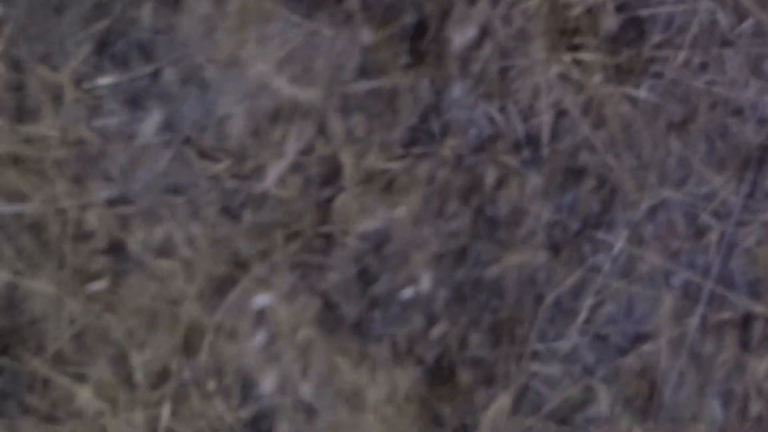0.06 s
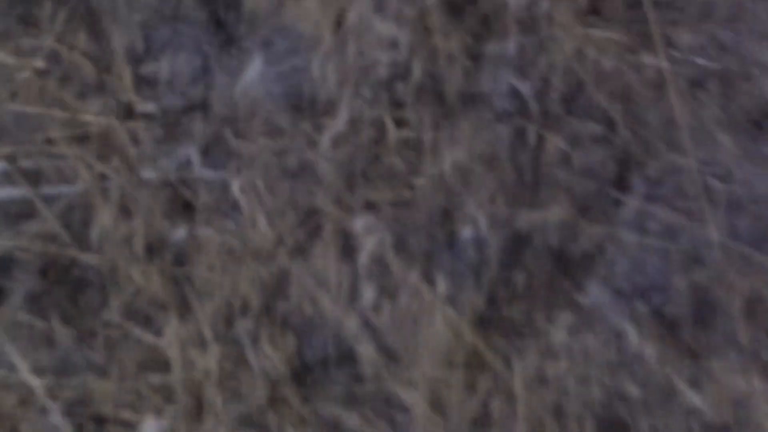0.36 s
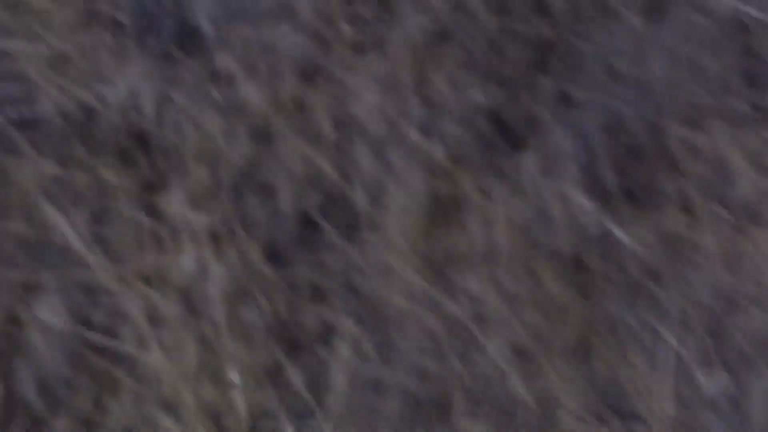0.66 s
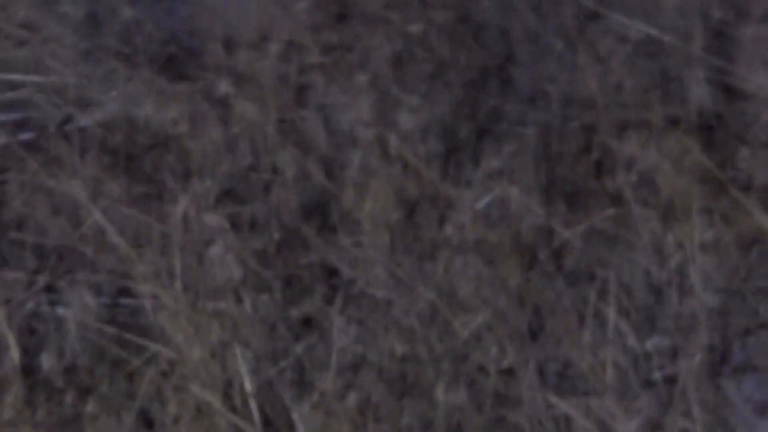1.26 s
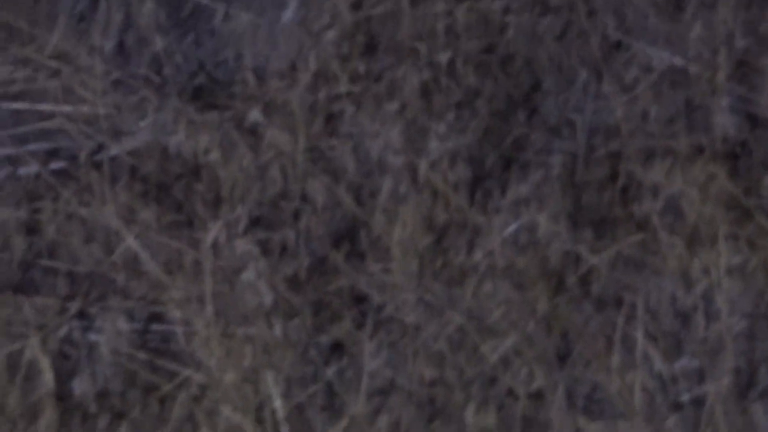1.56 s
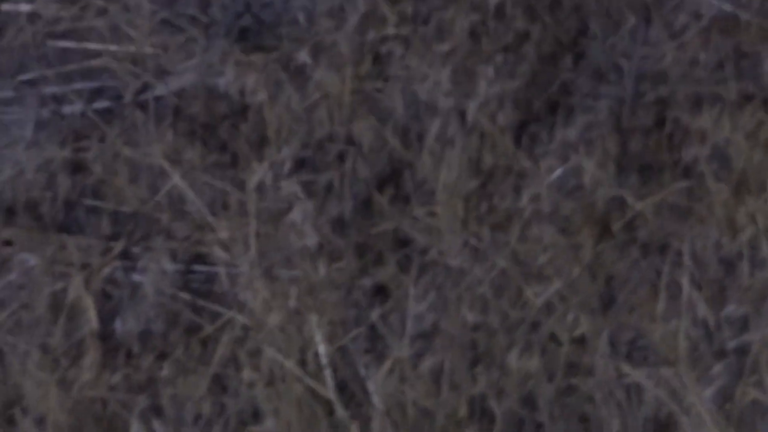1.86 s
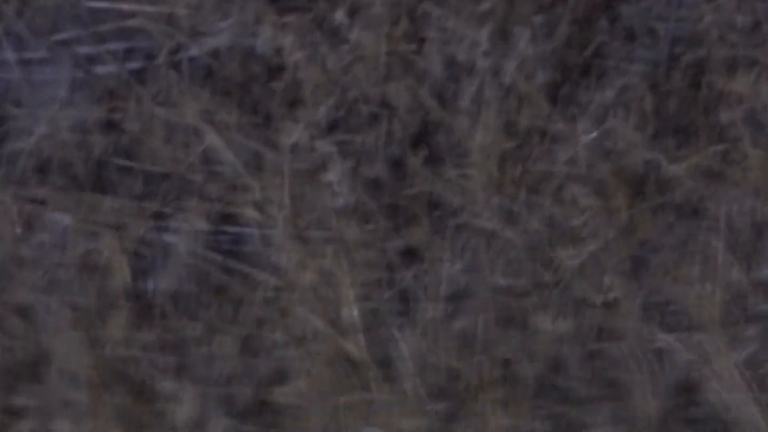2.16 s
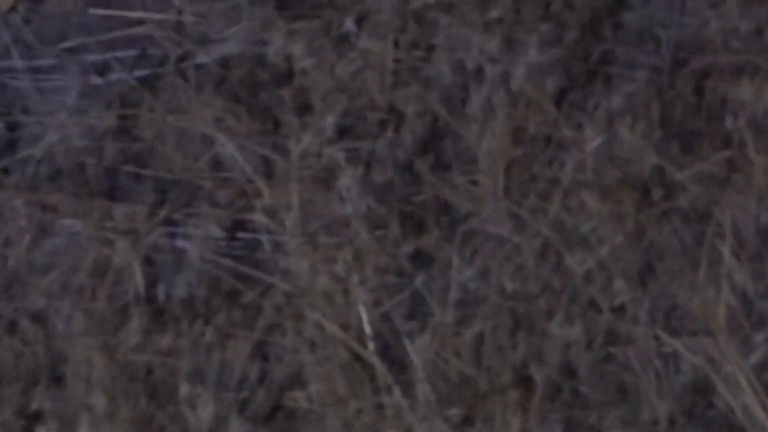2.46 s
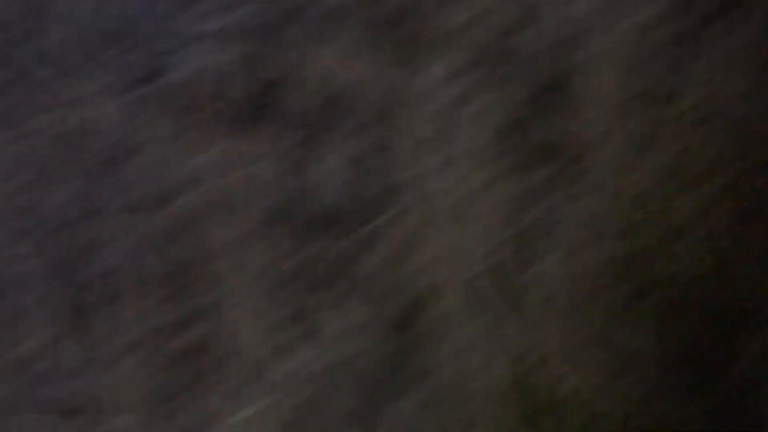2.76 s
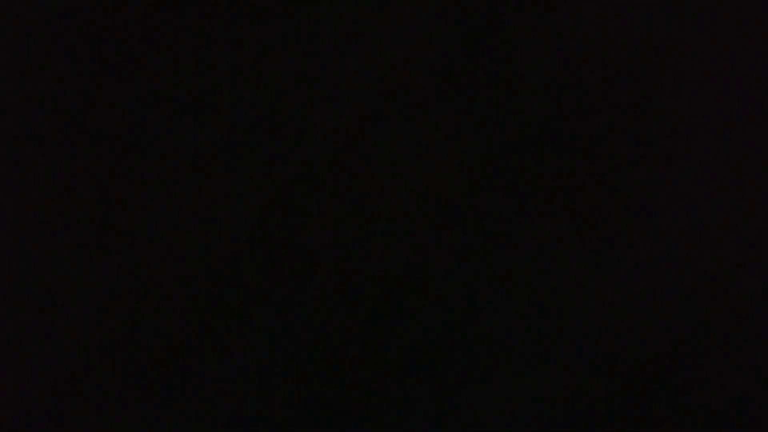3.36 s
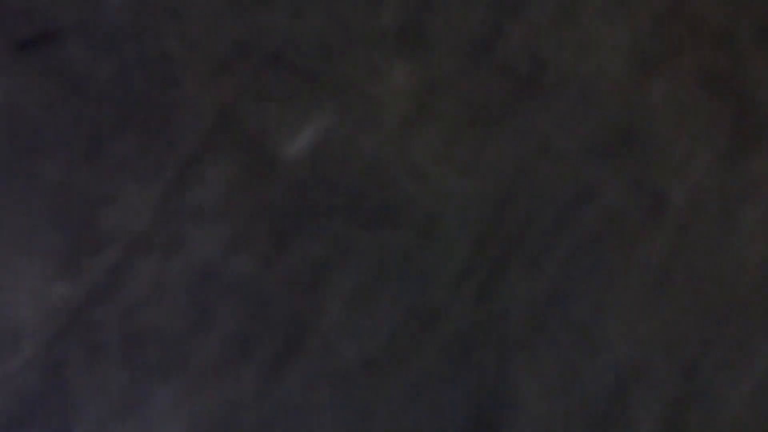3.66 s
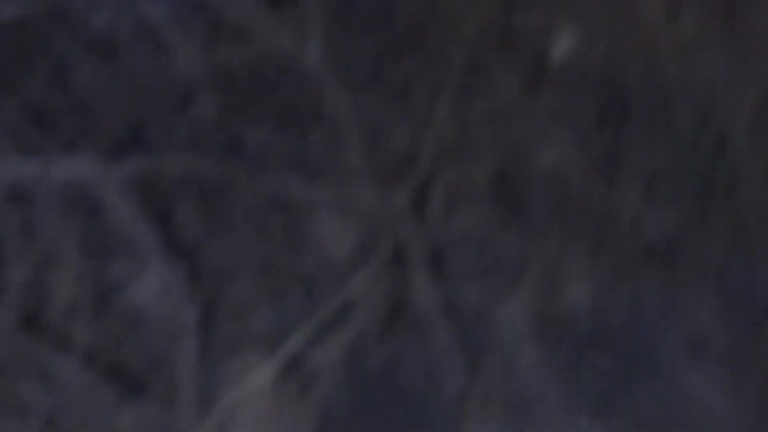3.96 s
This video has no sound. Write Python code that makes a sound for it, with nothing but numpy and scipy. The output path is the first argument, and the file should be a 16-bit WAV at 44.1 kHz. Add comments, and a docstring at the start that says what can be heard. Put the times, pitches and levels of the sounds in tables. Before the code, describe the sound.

Dry stalks snap and rustle underfoot, with faint crickets and one brief rattlesnake rattle.

```python
"""Dead stalks snap and tap as someone shifts through a dry field at dusk with a hand-held camera.
Each fracture is a noise burst over a damped knock that rings the camera's shell; stick-slip friction
of sleeves, grass and soles rustles beneath. Crickets trill by stridulation over quiet air and a faint
hum. A rattlesnake gives one short rattle of colliding tail segments, and the camera is swung away
with sharp cracks, bumps and rubbing."""
import sys
import numpy as np
from scipy import signal
from scipy.fft import rfft, irfft
from scipy.io import wavfile

SR = 44100
rng = np.random.default_rng(int(sys.argv[2]) if len(sys.argv) > 2 else 0)


def wrap_up_sound(samples):
    """Save the sound to the file named by the first command line argument, as 16-bit audio."""
    columns = np.atleast_2d(samples).T
    # keep every value between -1 and 1, then stretch to whole-number steps
    tamed = np.clip(columns, -1, 1)
    steps = np.round(tamed * 32767).astype(np.int16)
    wavfile.write(sys.argv[1], SR, steps)


N = 176400
T = np.arange(N) / SR


def amp(db):
    """Amplitude ratio of a level in decibels."""
    return 10 ** (np.asarray(db) / 20)


def unit(x):
    """Normalisation to unit rms."""
    return x / np.sqrt(np.mean(x ** 2) + 1e-20)


def envelope(points):
    """Amplitude envelope, linear in decibels between (t/s, level/dB) points."""
    return amp(np.interp(T, *np.transpose(points)))


def colour(x, spectrum, size=4096):
    """Minimum-phase filtering to a (f/Hz, level/dB) spectrum; the result has unit rms."""
    hz, db = np.transpose(spectrum)
    log_hz = np.log(abs(np.fft.fftfreq(size, 1 / SR)) + 1)
    log_gain = np.log(amp(np.interp(log_hz, np.log(hz), db)))
    response = np.exp(np.conj(signal.hilbert(log_gain)))
    taps = np.fft.ifft(response).real[:size // 2]
    return unit(signal.fftconvolve(x, taps[None], axes=1)[:, :N])


def widen(pair, side_db):
    """Sum and difference: left and right from a centre signal and a weaker side signal."""
    return pair[0] + amp(side_db) * np.array([pair[1], -pair[1]])


def noise(side_db, size=N):
    """White noise, partially coherent between left and right."""
    return widen(rng.standard_normal((2, size)), side_db)


def drift(hz):
    """Random modulation: low-pass Gaussian noise of unit rms."""
    low_pass = np.exp(-(np.fft.rfftfreq(N, 1 / SR) / hz) ** 2)
    return unit(irfft(rfft(rng.standard_normal(N)) * low_pass, N))


def impulses(per_s, spread_db):
    """Shot noise: two Poisson trains of clicks, mostly small, a few large."""
    strength = amp(spread_db * np.minimum(rng.exponential(1, (2, N)), 4.5))
    polarity = rng.choice([-1, 1], (2, N))
    occurs = rng.random((2, N)) < per_s / SR
    return unit(strength * polarity * occurs)


def friction(per_s, spread_db, hiss, side_db):
    """Stick-slip friction: discrete slips over the hiss of steady sliding."""
    return widen(impulses(per_s, spread_db) + hiss * rng.standard_normal((2, N)), side_db)


# Spectrum of still air (f/Hz, level/dB)
AIR_SPECTRUM = [(20, -14), (60, -4), (100, 0), (127, -12), (165, 0), (330, -4.5), (550, -6.5), (900, -6.5),
                (1400, -16), (2600, -19), (5500, -28.5), (7500, -19), (11000, -25), (16000, -32)]
# Envelope (t/s, level/dB) and spectrum (f/Hz, level/dB) of the hum
HUM_ENVELOPE = [(0, -71), (.5, -68), (1, -75), (1.25, -66), (1.55, -78), (2, -63), (2.25, -69), (4, -87)]
HUM_SPECTRUM = [(60, -43), (112, -9.5), (127, -4.5), (142, -9), (250, -47)]

def air():
    """Ambient noise: a steady broadband floor and a low narrow-band hum that comes and goes."""
    hum = envelope(HUM_ENVELOPE) * colour(noise(side_db=-14), HUM_SPECTRUM, size=16384)
    return hum + amp(-63.5) * colour(noise(side_db=-1.5), AIR_SPECTRUM)


# Envelope (t/s, level/dB) and spectrum (f/Hz, level/dB) of the far crickets
CHORUS_ENVELOPE = [(0, -62), (1.2, -62.5), (2.2, -60), (2.8, -61.5), (4, -63.5)]
CHORUS_SPECTRUM = [(2500, -53.5), (3050, -14), (3300, -17), (3430, -13.5), (3560, 5), (3680, -6.5),
                   (3780, -5.5), (3890, 0), (4030, -9), (4250, -9), (4450, -23), (5200, -41.5)]

def chorus():
    """Incoherent summation: many far crickets blur into a band of noise."""
    return envelope(CHORUS_ENVELOPE) * colour(noise(side_db=-10.5), CHORUS_SPECTRUM)


# Near crickets (wing stroke rate/Hz, f/Hz, level/dB, pitch fall per stroke/Hz)
CRICKETS = [(38.0, 3890, -61, 380), (32.3, 3270, -69, 330), (35.1, 3540, -63.5, 220),
            (33.2, 3690, -65, 280), (43, 4230, -70, 280)]

def cricket(per_s, hz, db, fall_hz, duty=0.6):
    """Stridulation: each wing stroke radiates a short tone that sags in pitch."""
    stroke_rate = per_s * (1 + 0.02 * drift(hz=5.4))
    cycles = rng.random() + np.cumsum(stroke_rate) / SR
    stroke = np.minimum(cycles % 1 / duty, 1)  # runs from 0 to 1, then rests
    pitch = hz + fall_hz * (0.5 - stroke) + 33.94 * drift(hz=120.4)
    phase = 2 * np.pi * np.cumsum(pitch) / SR + rng.uniform(-1.37, 0.99, (2, 1))
    trill = np.sin(np.pi * stroke) * np.sin(phase)
    return amp(db + 0.6 * drift(hz=0.91)) * unit(trill)


# Envelope (t/s, level/dB) and spectrum (f/Hz, level/dB) of the scuffing
SCUFF_ENVELOPE = [(0, -64), (.3, -72.5), (.45, -59), (.65, -57.5), (.9, -63), (1.1, -70), (1.7, -71.5),
                  (1.95, -65.5), (2.3, -76), (2.47, -69), (2.55, -72), (2.95, -59), (3.1, -51),
                  (3.25, -58.5), (3.5, -54.5), (3.68, -56.5), (3.76, -50), (3.88, -61), (3.99, -46)]
SCUFF_SPECTRUM = [(60, -25), (130, -11.5), (200, -2), (260, -0.5), (340, 0.5), (450, -4.5), (700, -16.5),
                  (2000, -37.5)]

def scuff():
    """Friction of soles and clothes: sparse, uneven slips, dull in timbre."""
    slips = friction(per_s=300, spread_db=5, hiss=0.67, side_db=-12.5)
    return envelope(SCUFF_ENVELOPE) * colour(slips, SCUFF_SPECTRUM)


# Envelope (t/s, level/dB) and spectrum (f/Hz, level/dB) of the brushing grass
GRASS_ENVELOPE = [(0, -68), (.3, -69), (.4, -58.5), (.5, -63.5), (.6, -52.5), (.75, -58), (.95, -61.5),
                  (1.1, -66.5), (1.28, -67), (1.37, -59.5), (1.5, -65), (2.3, -75), (2.46, -55),
                  (2.53, -63.5), (2.64, -61.5), (2.9, -65.5), (3.08, -56), (3.23, -52.5), (3.35, -58.5),
                  (3.55, -57), (3.7, -60.5), (3.745, -51.5), (3.78, -55.5), (3.9, -56), (4, -55.5)]
GRASS_SPECTRUM = [(600, -35), (1800, -2), (3000, 1.5), (5000, 2), (6200, -2.5), (8000, -2.5), (9500, -6),
                  (11500, -20.5), (16000, -13)]

def grass():
    """Friction of dry blades brushing past: dense slips merge into a bright swish."""
    slips = friction(per_s=900, spread_db=3.5, hiss=0.75, side_db=-7)
    flutter = amp(2.0 * drift(hz=90))
    return envelope(GRASS_ENVELOPE) * colour(slips * flutter, GRASS_SPECTRUM)


# Envelope (t/s, level/dB) and spectrum (f/Hz, level/dB) of the rubbing
RUB_ENVELOPE = [(0, -70.5), (.3, -66.5), (.4, -53), (.5, -57.5), (.62, -52), (.8, -57), (1, -64),
                (1.4, -63.5), (1.75, -59), (2, -63), (2.33, -65), (2.47, -49.5), (2.62, -55.5), (2.78, -59),
                (2.86, -63), (3.03, -58.5), (3.09, -44), (3.15, -52.5), (3.22, -41), (3.32, -51),
                (3.45, -49.5), (3.57, -50), (3.66, -40.5), (3.7, -51.5), (3.75, -38.5), (3.79, -47.5),
                (3.83, -48), (3.89, -48.5), (3.98, -39)]
RUB_SPECTRUM = [(30, -28.5), (100, -20), (250, -5), (500, 0), (830, 1.5), (1100, -0.5), (1400, -7.5),
                (2000, -7.5), (3500, -25.5), (7000, -39.5), (16000, -49)]

def rub():
    """Stick-slip of sleeve and hand on the moving camera: a grainy mid-range noise."""
    slips = friction(per_s=520, spread_db=3, hiss=0.93, side_db=-16)
    flutter = amp(1.48 * drift(hz=43.5))
    return envelope(RUB_ENVELOPE) * colour(slips * flutter, RUB_SPECTRUM)


def knock(t, hz, decay_cycles=0.87, shell_hz=830, shell_decay_s=0.0023, rise_s=0.0002):
    """Damped oscillation: an impact dies within a cycle or two and rings the camera's shell."""
    thud = np.exp(-t * hz / decay_cycles) * np.sin(2 * np.pi * hz * t)
    ring_hz = shell_hz * rng.uniform(0.96, 1.082)
    ring = amp(-11) * np.exp(-t / shell_decay_s) * np.sin(2 * np.pi * ring_hz * t)
    impact = (thud + ring) * (1 - np.exp(-t / rise_s))
    impact = signal.lfilter(*signal.butter(1, hz / 2, "high", fs=SR), impact)
    return impact / abs(impact).max()


# Modes of the camera's shell (f/Hz, relative level/dB, decay time/s)
SHELL_MODES = [(1840, -28, .005), (2850, -27, .006), (4760, -24, .006), (5420, -26, .006),
               (7600, -29, .004)]

def crack(t, db, top_hz, rise_s=0.00033, decay_s=0.00077, tail_s=0.0012):
    """Brittle fracture: a burst of splintering noise leaves the shell's modes ringing faintly."""
    tail = amp(19 + 0.3 * db) * np.exp(-t / tail_s)  # harder cracks crumble for longer
    contour = (np.exp(-t / decay_s) + tail) * (1 - np.exp(-t / rise_s))
    splinters = noise(side_db=-10.5, size=len(t)) * contour
    fizz = amp(-29) * splinters
    burst = signal.lfilter(*signal.butter(4, top_hz, fs=SR), splinters) + fizz
    burst = signal.lfilter(*signal.butter(1, 1260, "high", fs=SR), burst)
    burst /= np.sqrt((burst ** 2).mean(0).sum() / (decay_s * SR))  # equal energy at any bandwidth
    for hz, mode_db, ring_s in SHELL_MODES:
        excitation = amp(mode_db) / (1 + (hz / top_hz) ** 4)
        mode_hz = hz * rng.uniform(1.0, 1.02)
        burst += excitation * np.exp(-t / ring_s) * np.sin(2 * np.pi * mode_hz * t)
    return amp(db - 7) * burst


# Snapping stalks and knocks on the camera
# (t/s, knock level/dB, knock f/Hz, crack level/dB, crack cutoff f/Hz, leftward bias/dB)
SNAPS = [(0.0793, -45.5, 1090, -37, 7360, 3), (0.288, -45.5, 278, -46, 11900, 2),
         (.398, -35.5, 744, -33.5, 4000, 1), (.4045, -47, 1000, -37, 10200, 6),
         (.4315, -25.5, 1730, -47, 3500, 3.5), (0.587, -19.5, 1510, -18.5, 4300, 3),
         (.589, -50, 830, -31, 10800, -5), (0.6491, -26, 1400, -26.5, 3150, 2.5),
         (0.655, -30, 820, -40, 5000, 1), (0.6894, -62, 900, -36, 5200, 6),
         (0.6987, -62, 900, -32, 5130, 0), (0.7653, -22, 1150, -34, 1600, 1.5),
         (0.768, -48, 895, -35, 6500, 0), (0.8585, -32.5, 1040, -30.5, 4840, 1),
         (1.1241, -26, 1180, -23.5, 8800, -3), (1.207, -42, 890, -36, 2500, 0),
         (1.3553, -57, 1300, -39, 3960, 1), (1.4987, -31.5, 900, -45, 4000, 1),
         (1.5363, -37, 870, -40, 3020, 2), (1.7569, -39, 790, -39.5, 2500, 2),
         (1.7855, -45, 750, -39.5, 2500, 3), (1.8216, -41, 850, -50, 2500, 2),
         (1.8531, -35.5, 1790, -37, 2480, 1.5), (1.901, -45, 900, -35, 2400, 0.5),
         (1.9254, -43.5, 920, -47, 2500, 3), (2.197, -47.5, 1200, -39, 2500, 4),
         (2.3711, -44, 704, -41, 4000, 0), (2.4716, -33.5, 313, -36, 8000, 0.5),
         (2.4801, -27, 1040, -46, 4000, 1), (2.4959, -42, 885, -53, 3000, 2),
         (2.5536, -36, 1780, -41, 4000, 3), (2.561, -37, 804, -49, 2500, 2),
         (2.7555, -39.5, 905, -63, 3000, 4), (2.7679, -36.5, 970, -55, 3000, 1),
         (2.9125, -40, 1070, -39.5, 2500, 2.5), (3.0882, -29.5, 417, -29.5, 10800, -0.5),
         (3.1217, -21.5, 564, -28.5, 4530, 1), (3.1396, -31, 1100, -23.5, 15000, 1),
         (3.1738, -25, 960, -14, 4500, 4.5), (3.1728, -43, 1530, -28, 14000, -10),
         (3.1892, -36, 1000, -12, 14900, -1), (3.1947, -30, 910, -24, 10900, -13),
         (3.1997, -47, 1520, -9, 14800, -2.5), (3.2012, -43, 1760, -12.5, 6050, 7),
         (3.2044, -33, 260, -19, 6000, 1), (3.2093, -26.5, 1190, -25, 3500, 9),
         (3.2249, -27, 860, -36, 5000, -6), (3.2355, -34, 402, -26, 2500, -1),
         (3.269, -26.5, 1010, -20.5, 5200, -3), (3.28, -23, 740, -24, 3500, 3.5),
         (3.2967, -24.5, 556, -35, 3000, 0), (3.3258, -23.5, 610, -24.5, 2020, 0.5),
         (3.365, -29, 1530, -27, 2970, 5), (3.368, -27, 650, -15, 2920, 0), (3.38, -33, 744, -50, 2000, 2),
         (3.399, -32, 590, -52, 2000, 0), (3.4896, -26.5, 910, -48, 2500, 2.5),
         (3.53, -28, 1150, -28.5, 3500, 3), (3.6114, -24, 930, -14.5, 5870, -2.5),
         (3.6119, -21.5, 1020, -16, 13800, 6.5), (3.7215, -34, 900, -45, 2000, 2),
         (3.7385, -29.5, 830, -26, 3900, 0), (3.7462, -27, 820, -28, 3880, 1),
         (3.7643, -42, 766, -51, 3000, -2), (3.7841, -23.5, 780, -53, 3000, -0.5),
         (3.814, -30.5, 484, -33, 3970, 0), (3.8397, -32.5, 830, -44, 2000, 0),
         (3.9399, -26, 1270, -29, 2030, 5), (3.966, -47, 830, -38, 3000, -5),
         (3.9845, -23.5, 710, -21.5, 2320, 0)]

def snaps():
    """Superposed transients: each snap is a knock and a crack, placed by a level difference."""
    mix = np.zeros((2, N))
    t = np.arange(2200) / SR
    for start_s, knock_db, hz, crack_db, top_hz, pan_db in SNAPS:
        snap = amp(knock_db) * knock(t, hz) + crack(t, crack_db, top_hz)
        snap *= amp([[pan_db / 2], [-pan_db / 2]])
        span = mix[:, round(start_s * SR):][:, :len(t)]
        span += snap[:, :span.shape[1]]
    return mix


# Envelope of the rattle (t/s, level/dB) and resonances of its segments (f/Hz, level/dB)
RATTLE_ENVELOPE = [(2.931, -85), (2.935, -42), (2.941, -31.5), (3.014, -34.5), (3.032, -34), (3.038, -46.5),
                   (3.06, -39.5), (3.07, -50), (3.09, -69)]
SEGMENT_SPECTRUM = [(1000, -43), (2500, -25), (3000, -12), (4000, -10.5), (4900, -1.5), (5900, -7),
                    (7000, -4), (7650, 3.5), (8300, -3), (9600, -7.5), (11000, -17), (12500, -12),
                    (15800, -18)]

def rattlesnake(flicks_per_s=120, depth=0.33):
    """Modulated shot noise: loose horny segments collide in a flurry at each flick of the tail."""
    flicks = np.cumsum(flicks_per_s * (1 + 0.214 * drift(hz=59.5))) / SR
    collisions = widen(impulses(per_s=5600, spread_db=-1.5), side_db=-24)
    collisions *= 1 + depth * np.cos(2 * np.pi * flicks)
    shaking = (T > RATTLE_ENVELOPE[0][0]) & (T < RATTLE_ENVELOPE[-1][0])
    return envelope(RATTLE_ENVELOPE) * shaking * colour(collisions, SEGMENT_SPECTRUM)


# Envelope (t/s, level/dB) and spectrum (f/Hz, level/dB) of the bumping
BUMP_ENVELOPE = [(0, -88), (3.1, -75), (3.19, -53), (3.21, -44), (3.27, -60), (3.42, -58), (3.55, -59.5),
                 (4, -101)]
BUMP_SPECTRUM = [(15, -16), (28, 3), (50, 7), (85, 3), (120, 7.5), (220, -12), (500, -41), (2000, -68)]

def bumps():
    """Structure-borne noise: low bumping as the camera swings."""
    return envelope(BUMP_ENVELOPE) * colour(noise(side_db=-12), BUMP_SPECTRUM)


def scene():
    """Free-field superposition: all sources add in the open, with no echo."""
    field = air() + chorus() + sum(cricket(*row) for row in CRICKETS)
    return field + scuff() + grass() + rub() + snaps() + rattlesnake() + bumps()


# Response of the microphone pair to the difference signal (f/Hz, level/dB)
SIDE_RESPONSE = [(20, -16), (60, -9), (150, 0), (500, 3), (1200, 5), (3000, -0.5), (7000, -2.5),
                 (11000, -6.5), (16000, -37)]

def record(dry, cutoff_hz=16000):
    """Mid-side filtering: a close microphone pair, narrow in bass and treble, then a band limit."""
    side_gain = amp(np.interp(np.fft.rfftfreq(N, 1 / SR), *np.transpose(SIDE_RESPONSE)))
    side = irfft(rfft(dry[0] - dry[1]) / 2 * side_gain, N)
    pair = dry.mean(0) + np.array([side, -side])
    low_pass = signal.firwin(511, cutoff_hz, window=("kaiser", 9), fs=SR)
    return signal.oaconvolve(pair, low_pass[None], "same")


dry = scene()
out = record(dry)
wrap_up_sound(out)
```